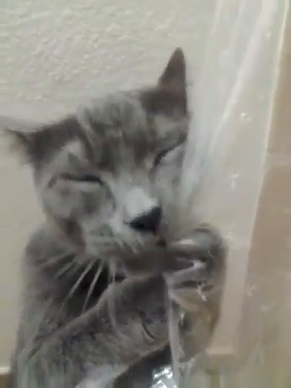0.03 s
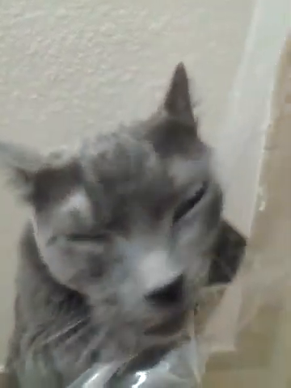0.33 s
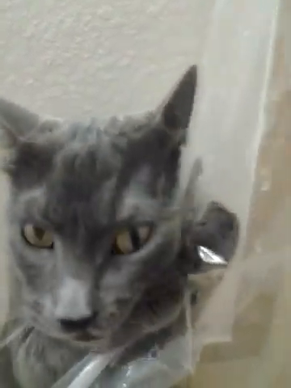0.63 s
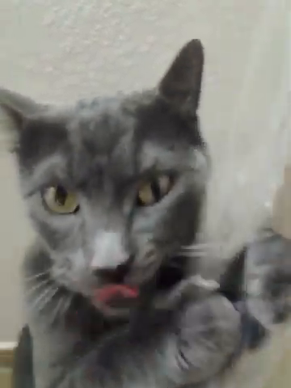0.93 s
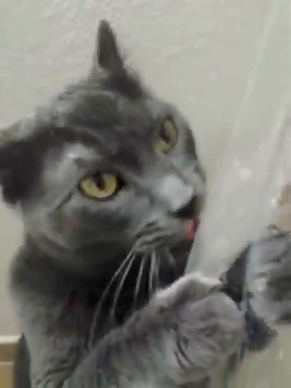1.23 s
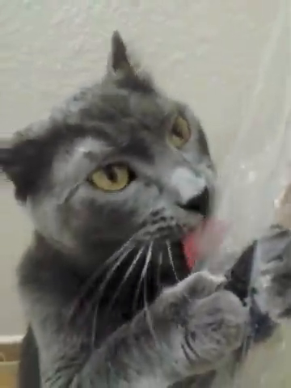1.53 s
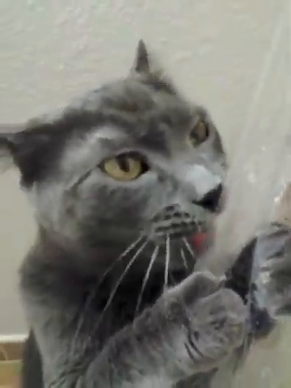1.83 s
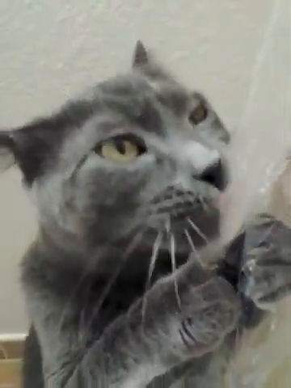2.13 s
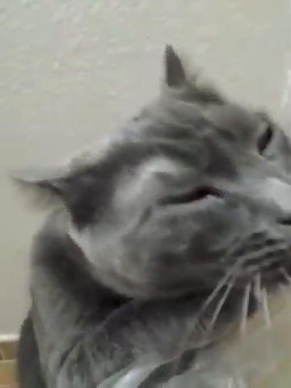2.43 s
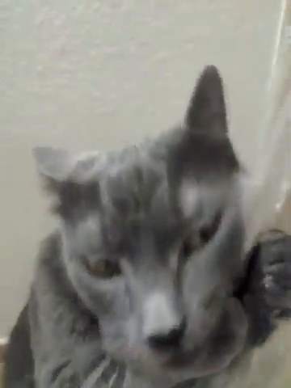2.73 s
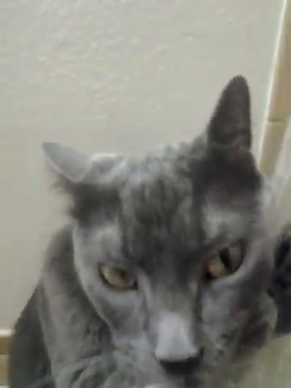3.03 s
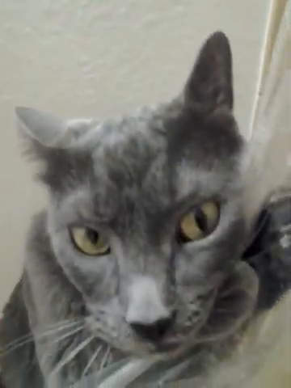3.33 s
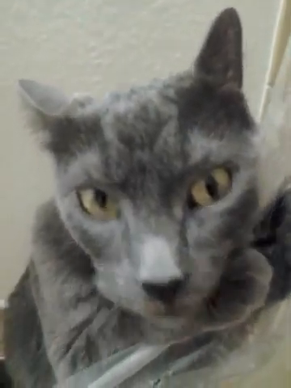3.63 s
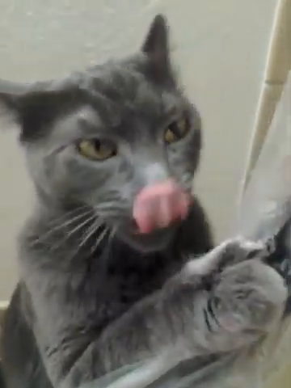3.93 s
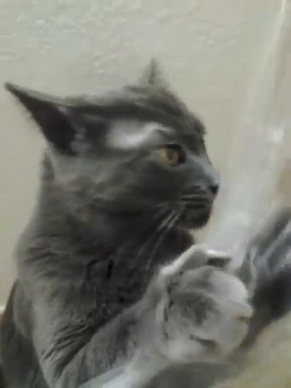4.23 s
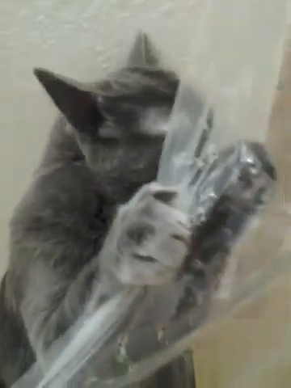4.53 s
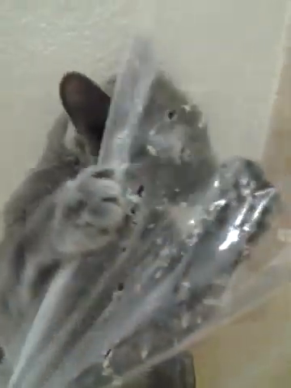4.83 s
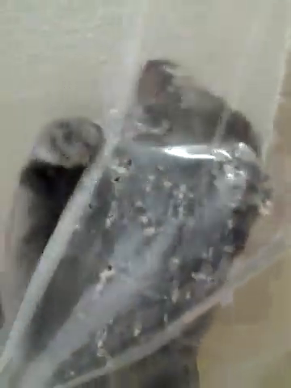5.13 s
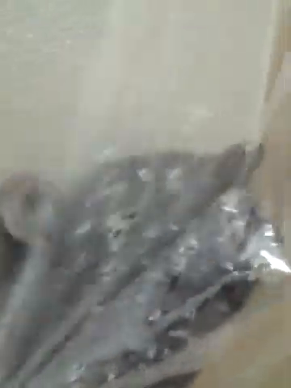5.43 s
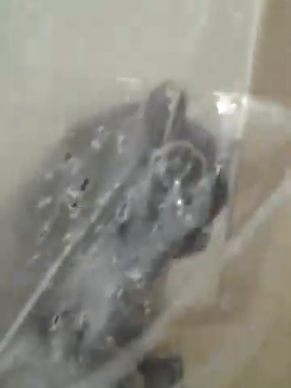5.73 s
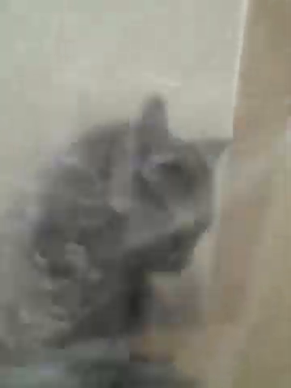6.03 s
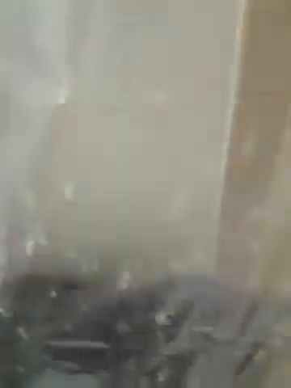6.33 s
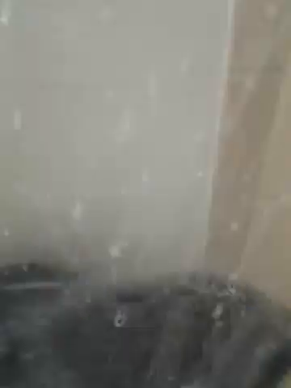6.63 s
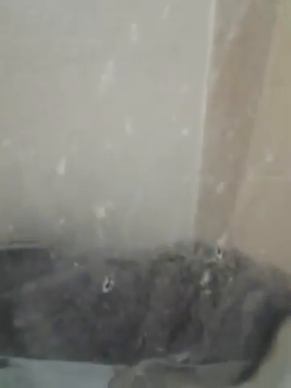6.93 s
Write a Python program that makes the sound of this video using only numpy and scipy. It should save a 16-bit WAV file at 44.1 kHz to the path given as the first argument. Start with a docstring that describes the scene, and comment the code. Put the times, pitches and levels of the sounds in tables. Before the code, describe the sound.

A cat licks and paws a thin plastic curtain, with faint crinkling, wet smacks, soft thumps and one loud slap over room hum.

```python
"""Soft wet smacks and a faint rustle come first, over an appliance's hum and microphone hiss and whine:
a cat is licking and pawing a thin plastic curtain in a small, hard-walled room. Friction makes the film
swish, folding makes it crinkle, and its creases snap as they buckle. A few dull thumps excite the room's
standing waves. Twice the sheet slaps hard against something, the second time with a loud double crack."""
import sys
import numpy as np
from scipy import signal
from scipy.fft import rfft, irfft, next_fast_len
from scipy.io import wavfile
from scipy.ndimage import uniform_filter1d

SR = 44100
rng = np.random.default_rng(int(sys.argv[2]) if len(sys.argv) > 2 else 0)


def log_audio(samples):
    """Write samples as a 16-bit WAV file to the path given in sys.argv[1]."""
    # one column per channel
    frames = np.atleast_2d(samples).T
    # limit to full scale, then quantise
    limited = np.clip(frames, -1, 1)
    pcm = np.round(limited * 32767).astype(np.int16)
    wavfile.write(sys.argv[1], SR, pcm)


N = 312228
TIME = np.arange(N) / SR
AGE = TIME[:SR // 2]  # seconds since a blow

# Levels in the tables are relative, ahead of the mix.
# spectrum of still air and microphone hiss: frequency_hz, density_db
AIR_SPECTRUM = [(18, -2.5), (28, 2.5), (42, -5.5), (90, -13.5), (150, -4.5), (270, -4.5), (340, -13.5),
                (600, -17), (1000, -21.5), (2000, -25), (5000, -28.5), (10000, -31), (15500, -29.5)]
# partials of the appliance: pitch_hz, level_db, waver_fraction
HUM_PARTIALS = [(58.6, -58.5, 0.25), (119, -64.5, 0.04), (185.8, -59.5, 0.5), (236.2, -57, 0.36),
                (289, -57, 0.02)]
# tones of the electronics: pitch_hz, level_db
WHINE_TONES = [(6000, -70), (12000, -60.5)]
# reverberation time of the room: frequency_hz, t60_s
ROOM_DECAY = [(100, 0.62), (450, 0.39), (1200, 0.22), (4000, 0.25), (14000, 0.16)]
# standing waves between the walls: pitch_hz, width_hz, gain_db
ROOM_MODES = [(119, 4, -17), (391, 3.6, -9), (430, 4, -14), (530, 7.2, -16)]
# soft impacts: start_s, level_db, push_s, bright_hz, boom_hz, boom_db, landing_fraction
THUMPS = [(0.381, -41.5, 0.062, 1100, 65, -1, 0), (1.252, -49.5, 0.067, 890, 170, 1, 0),
          (4.007, -45, 0.029, 790, 110, 0, 0.1), (4.2197, -39.5, 0.035, 610, 61.6, -7, 0.5),
          (5.301, -40.5, 0.018, 400, 45, 0, 0.5), (5.587, -26.5, 0.039, 1600, 157, -5.5, 0.43),
          (6.156, -29, 0.067, 1360, 453, 5.5, 0.3)]
# spectrum of a soft impact: frequency_hz, density_db
THUMP_SPECTRUM = [(35, -2), (70, -9.5), (120, 4.5), (190, -1), (280, 3), (550, -1.5), (1000, -2.5),
                  (1500, -4), (3000, -9.5), (8000, -14)]
# mouth smacks and soft taps: start_s, level_db, pitch_hz, width_octaves, t60_s
SMACKS = [(0.1365, -48, 850, 1.1, 0.02), (0.22, -51.5, 600, 0.66, 0.0088), (0.287, -47, 770, 0.94, 0.091),
          (0.715, -49, 1440, 2.2, 0.063), (0.774, -41.5, 1010, 0.77, 0.015),
          (0.833, -48.5, 2190, 0.7, 0.047), (1.576, -57, 1900, 1.7, 0.017), (2.698, -48.5, 656, 1.9, 0.031),
          (3.876, -54.5, 600, 1.2, 0.01), (4.122, -40.5, 850, 1.5, 0.008), (4.671, -51, 780, 0.9, 0.024),
          (5.476, -43.5, 650, 1.9, 0.044), (5.817, -46.5, 640, 1.2, 0.026),
          (6.739, -48.5, 576, 0.64, 0.032), (6.769, -41.5, 630, 0.75, 0.024)]
# continuous stirring of the film by the cat: time_s, swish_db
STIR_LEVELS = [(0, -55.5), (0.65, -57.5), (1.1, -60), (1.5, -62.5), (2.2, -60.5), (2.55, -56.5),
               (2.85, -60.5), (3.05, -67), (3.58, -68), (3.72, -57), (4.05, -68), (4.4, -56.5), (4.9, -61),
               (5.45, -54.5), (5.95, -61), (6.42, -51), (6.75, -62.5), (7.08, -63)]
# strokes of tongue or paw: start_s, length_s, swish_db, crinkle_db
STROKES = [(0.403, 0.11, -52, -66), (0.763, 0.12, -62, -56), (0.917, 0.09, -51, -57.5),
           (1.048, 0.043, -68, -55), (1.215, 0.06, -57, -65), (1.607, 0.071, -49.5, -54.5),
           (1.831, 0.04, -59, -57), (1.988, 0.092, -52, -60.5), (2.248, 0.15, -59, -59.5),
           (4.0, 0.22, -70, -61.5), (4.308, 0.05, -64, -55), (4.414, 0.086, -53.5, -58),
           (5.13, 0.024, -50.5, -55), (5.298, 0.062, -44.5, -50), (5.38, 0.047, -65, -51),
           (5.449, 0.025, -52, -47), (5.775, 0.04, -59, -55), (6.477, 0.032, -69, -51.5)]
# spectrum of folding film: frequency_hz, density_db
CRINKLE_SPECTRUM = [(200, -12), (500, 5), (1200, 0.5), (2800, -3.5), (4500, -14), (9000, -15), (16000, -35)]
# spectrum of rubbed film: frequency_hz, density_db
SWISH_SPECTRUM = [(1000, -13), (3000, -2.5), (5300, -2.5), (8000, -4.5), (12000, -2.5), (16000, -10.5)]
# buckling creases: start_s, ring_db, pitch_hz, width_octaves, crackle_db, t60_s
SNAPS = [(0.434, -50.5, 2680, 0.94, -61, 0.01), (0.584, -48.5, 1870, 1.7, -46, 0.083),
         (0.64, -56, 7500, 0.4, -54, 0.011), (0.989, -69, 2500, 1.3, -45.5, 0.04),
         (1.628, -52, 4900, 0.83, -56, 0.41), (2.377, -46, 1800, 0.84, -46, 0.023),
         (2.5, -42, 1670, 0.49, -38, 0.009), (2.527, -44, 4500, 0.56, -46, 0.039),
         (2.555, -43.5, 1730, 0.74, -43.5, 0.012), (2.6354, -44.5, 1720, 1.3, -41.5, 0.014),
         (2.8797, -56, 4300, 0.92, -51.5, 0.0099), (2.9468, -43, 1830, 1.6, -57, 0.13),
         (3.692, -57, 1590, 1.7, -56.5, 0.014), (3.9116, -53, 1900, 1.6, -58, 0.018),
         (3.961, -67, 3840, 2.2, -53, 0.019), (4.3284, -44.5, 1310, 3.1, -49, 0.012),
         (4.462, -54, 3070, 0.69, -42.5, 0.018), (4.764, -50.5, 6700, 0.44, -46.5, 0.061),
         (4.957, -51.5, 1480, 1.5, -45, 0.13), (5.005, -44, 1170, 1.64, -52, 0.01),
         (5.2082, -51.5, 2660, 3.2, -56, 0.016), (5.26, -31, 1880, 1.7, -50, 0.0021),
         (5.3062, -40, 1100, 3.3, -48, 0.034), (5.565, -43.5, 1090, 3.2, -42, 0.027),
         (5.77, -51, 1410, 0.67, -66, 0.0059), (5.795, -51.5, 845, 0.9, -47, 0.017)]
# hard impacts of the sheet: start_s, crack_peak_db, flutter_db, flutter_t60_s, ring_db, ring_hz
SLAPS = [(4.219, -14.5, -26.5, 0.12, -32.5, 2700), (6.0164, 9, -16.5, 0.26, -36, 1720),
         (6.059, -7, -41, 0.027, -26, 616)]
# spectrum of the fluttering sheet: frequency_hz, density_db
FLUTTER_SPECTRUM = [(40, -3), (100, -1.5), (260, 3), (400, -11), (620, 1), (1100, -1.5), (1800, -5.5),
                    (2800, -0.5), (4200, -5), (8000, -8.5), (12500, -11), (15500, -15.5)]


def from_db(db):
    """Amplitude grows tenfold every 20 dB."""
    return 10 ** (np.asarray(db) / 20)


def unit_rms(x):
    """Normalisation to a mean power of 1."""
    return x / np.sqrt(np.mean(x ** 2) + 1e-20)


def unit_onset(x):
    """Normalisation of a blow to rms 1 over its first 20 ms."""
    return x / np.sqrt(np.mean(x[:SR // 50] ** 2))


def at_hz(points, hz):
    """Interpolation on a log-frequency axis."""
    freqs, values = np.transpose(points)
    return np.interp(np.log(hz + 1e-3), np.log(freqs), values)


def butter(x, hz, kind, order=2):
    """Filtering with a maximally flat passband."""
    sections = signal.butter(order, np.clip(hz, 10, .45 * SR), kind, fs=SR, output="sos")
    return signal.sosfilt(sections, x)


def resonate(x, hz, width_hz):
    """A damped resonator with a peak gain of 1."""
    r = np.exp(-np.pi * width_hz / SR)
    feedback = [1, -2 * r * np.cos(2 * np.pi * hz / SR), r * r]
    return signal.lfilter(np.array([1, 0, -1]) * (1 - r * r) / 2, feedback, x)


def coloured(x, spectrum):
    """Spectral shaping, normalised to rms 1."""
    size = 2 * next_fast_len(len(x))
    gain = from_db(at_hz(spectrum, np.fft.rfftfreq(size, 1 / SR)))
    return unit_rms(irfft(rfft(x, size) * gain)[:len(x)])


def whiten(x, grain_hz):
    """Whitening flattens a spectrum, leaving only ripple finer than the grain."""
    spectrum = rfft(x, 2 * len(x))
    power = uniform_filter1d(np.abs(spectrum) ** 2, max(round(grain_hz * 2 * len(x) / SR), 1))
    return irfft(spectrum / np.sqrt(np.abs(power) + 1e-20))[:len(x)]


def drift(per_s):
    """Random modulation of rms 1."""
    knots = rng.standard_normal(int(N / SR * per_s) + 3)
    return unit_rms(np.interp(TIME * per_s, np.arange(len(knots)), knots))


def decay(t60):
    """Exponential damping: 60 dB in t60 seconds."""
    return from_db(-60 * AGE / max(t60, 1e-3))


def burst(envelope, grain_hz):
    """Dense irregular impacts merge into noise under an envelope."""
    return whiten(rng.standard_normal(len(AGE)) * envelope, grain_hz)


def release_force(t60, click_s=0.0037):
    """A quick release of stress approaches an impulse; a slow one rasps."""
    force = burst(decay(t60), grain_hz=476)
    force[0] += 2 * click_s / t60
    return force


def ringing(force, hz, octaves):
    """Heavy damping gives a film facet or the mouth a short, broad resonance."""
    return unit_onset(butter(force, [hz * 2 ** (-octaves / 2), hz * 2 ** (octaves / 2)], "band"))


def add(track, start_s, sound):
    """Superposition of a sound on a track."""
    start = max(round(start_s * SR), 0)
    track[start:start + len(sound)] += sound[:N - start]


def background(air_db=-51, waver_per_s=9):
    """Broadband noise lies under a hum modulated in amplitude and phase, and a steady electrical whine."""
    out = from_db(air_db) * coloured(rng.standard_normal(N), AIR_SPECTRUM)
    for hz, level_db, waver in HUM_PARTIALS:
        swell = 1 + waver * (drift(waver_per_s) + 1j * drift(waver_per_s))
        carrier = np.exp(2j * np.pi * (hz * TIME + rng.random()))
        out += from_db(level_db) * unit_rms(np.real(swell * carrier))
    for hz, level_db in WHINE_TONES:
        out += from_db(level_db) * unit_rms(np.sin(2 * np.pi * hz * TIME))
    return out


def reverberation(x, first_echo_s=0.003, near_db=-6, near_t60=0.022):
    """A near wall reflects early; absorption then damps the treble sooner than the bass."""
    edges_hz = np.geomspace(40, 19000, num=10)
    tail = np.zeros(len(AGE))
    for low, high in zip(edges_hz, edges_hz[1:]):
        band = butter(rng.standard_normal(len(AGE)), [low, high], "band", order=3)
        tail += band * decay(at_hz(ROOM_DECAY, np.sqrt(low * high)))
    response = whiten(tail * (1 + from_db(near_db) * decay(near_t60)), grain_hz=40)
    return signal.fftconvolve(x, np.pad(response, (round(first_echo_s * SR), 0)))[:N]


def standing_waves(x):
    """Each room mode responds as a narrow resonator."""
    return sum(from_db(gain_db) * resonate(x, hz, width_hz) for hz, width_hz, gain_db in ROOM_MODES)


def thumps(release_t60=0.1, boom_width_hz=55, contact_t60=0.21, settled_ratio=0.41):
    """Soft contact acts as a low-pass filter: a weight lands, pushes, and sounds duller as it settles."""
    out = np.zeros(N)
    for start_s, level_db, push_s, bright_hz, boom_hz, boom_db, landing in THUMPS:
        push = from_db(-60 * np.maximum(AGE - push_s, 0) / release_t60)
        force = burst(push, grain_hz=50)
        force[0] += landing
        force = coloured(force, THUMP_SPECTRUM)
        force += from_db(boom_db) * resonate(force, boom_hz, boom_width_hz)
        bright = butter(force, bright_hz, "low", order=3)
        dull = butter(force, settled_ratio * bright_hz, "low")
        fresh = decay(contact_t60)
        thud = fresh * bright + np.sqrt(1 - fresh ** 2) * dull
        push_power = np.sum(thud ** 2) / (push_s * SR)
        add(out, start_s, from_db(level_db) * thud / np.sqrt(push_power))
    return out


def smacks():
    """Wet smacks of the mouth and soft taps excite low, damped resonances."""
    out = np.zeros(N)
    for start_s, level_db, hz, octaves, t60 in SMACKS:
        add(out, start_s, from_db(level_db) * ringing(release_force(t60), hz, octaves))
    return out


def stir_db(time_s):
    """Level of the film's agitation, interpolated in time."""
    return np.interp(time_s, *np.transpose(STIR_LEVELS))


def ticks(per_s=5, low_hz=1300, high_hz=3800, against_stir_db=-1.5, spread_db=0.5):
    """Small creases release elastic energy at random, as strongly as the film is stirred."""
    out = np.zeros(N)
    for when, pitch, softness in rng.random((round(per_s * N / SR), 3)):
        start_s = when * N / SR
        hz = low_hz * (high_hz / low_hz) ** pitch
        level_db = stir_db(start_s) + against_stir_db + spread_db * (1 - 2 * softness)
        add(out, start_s, from_db(level_db) * ringing(release_force(t60=0.0097), hz, octaves=0.8))
    return out


def slips(per_s, spread_db, clump_db):
    """Stick-slip motion gives tiny impulses of uneven size, in clumps."""
    sizes = from_db(spread_db * np.minimum(rng.exponential(1, N), 4))
    signs = rng.choice([-1, 1], N)
    slipping = rng.random(N) < per_s / SR
    return sizes * signs * slipping * from_db(clump_db * drift(per_s=120))


def rustle(stir_crinkle_db=-4.5, attack_s=0.012, release_t60=0.15):
    """Friction swishes and folding crinkles; stirring and strokes are incoherent, so their powers add."""
    swish_power = from_db(stir_db(TIME)) ** 2
    crinkle_power = swish_power * from_db(stir_crinkle_db) ** 2
    for start_s, length_s, swish_db, crinkle_db in STROKES:
        rise = np.clip((TIME - start_s) / attack_s, 0, 1)
        fall = from_db(-60 * np.clip(TIME - start_s - length_s, 0, 1) / release_t60)
        swish_power += (from_db(swish_db) * rise * fall) ** 2
        crinkle_power += (from_db(crinkle_db) * rise * fall) ** 2
    crinkle = coloured(slips(per_s=4000, spread_db=3, clump_db=3.5), CRINKLE_SPECTRUM)
    swish = coloured(slips(per_s=10000, spread_db=2.5, clump_db=1.3), SWISH_SPECTRUM)
    return crinkle * np.sqrt(crinkle_power) + swish * np.sqrt(swish_power)


def snaps(knock_hz=(300, 1300), crackle_hz=(2000, 9500)):
    """Snap-through buckling: a crease's facet rings, its edge crackles and the sheet around it knocks."""
    out = np.zeros(N)
    for start_s, ring_db, hz, octaves, crackle_db, t60 in SNAPS:
        force = release_force(t60)
        ring = from_db(ring_db) * ringing(force, hz, octaves)
        # larger, lower facets move more of the sheet: 9 dB per octave
        knock_db = ring_db - 3.5 - 9 * np.log2(hz / 1690)
        knock = from_db(knock_db) * unit_onset(butter(force, knock_hz, "band"))
        crackle = from_db(crackle_db) * unit_onset(butter(force, crackle_hz, "band", order=1))
        add(out, start_s, ring + knock + crackle)
    return out


def slaps(crack_t60=0.012, crack_hz=(220, 2600), jolt=1.0):
    """Impulsive excitation: the taut sheet cracks with one jolt, rings briefly, then flutters to rest."""
    out = np.zeros(N)
    for start_s, crack_db, flutter_db, t60, ring_db, ring_hz in SLAPS:
        force = burst(decay(crack_t60), grain_hz=990)
        force[0] -= jolt
        crack = butter(force, crack_hz, "band", order=1)
        ring = resonate(burst(decay(t60 / 2), grain_hz=300), ring_hz, width_hz=450)
        flutter = coloured(burst(decay(t60), grain_hz=60), FLUTTER_SPECTRUM)
        add(out, start_s, from_db(crack_db) * crack / np.abs(crack).max())
        add(out, start_s, from_db(ring_db) * unit_onset(ring))
        add(out, start_s, from_db(flutter_db) * unit_onset(flutter))
    return out


def scene():
    """Direct and reflected sound add, alike in both channels; the thumps are the most reverberant."""
    clicks = snaps() + smacks() + ticks()
    slap, thump, film = slaps(), thumps(), rustle()
    direct = from_db(-0.5) * clicks + slap + from_db(4) * thump + from_db(1) * film
    to_walls = from_db(-6) * clicks + from_db(-7) * slap + from_db(0.5) * thump + from_db(-14.5) * film
    mono = direct + reverberation(to_walls) + standing_waves(thump) + background()
    return np.array([mono, mono])


def record(dry, full_scale=0.95, cutoff_hz=15800):
    """Overload clips the loudest crack; a steep low-pass filter removes the highest treble."""
    low_pass = signal.ellip(12, .1, 80, cutoff_hz, fs=SR, output="sos")
    return signal.sosfilt(low_pass, np.clip(dry, -full_scale, full_scale))


dry = scene()
out = record(dry)
log_audio(out)
```